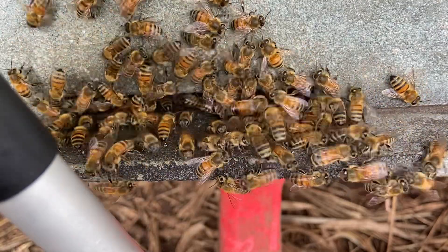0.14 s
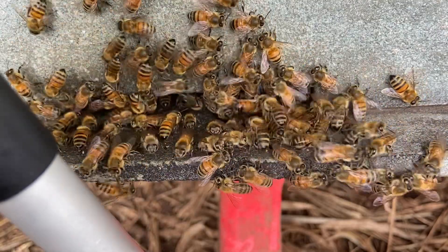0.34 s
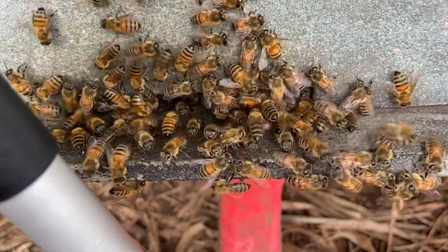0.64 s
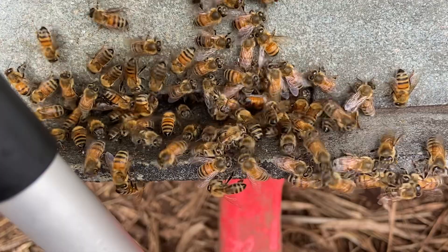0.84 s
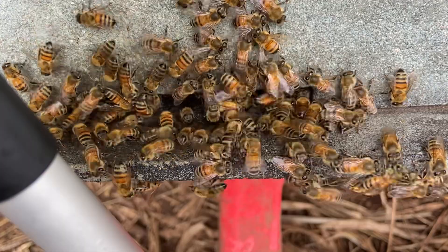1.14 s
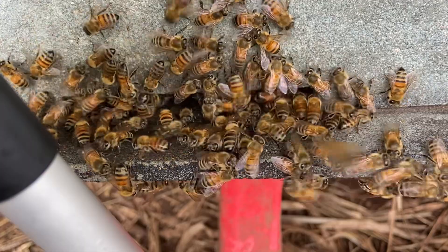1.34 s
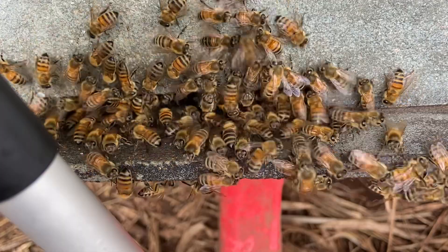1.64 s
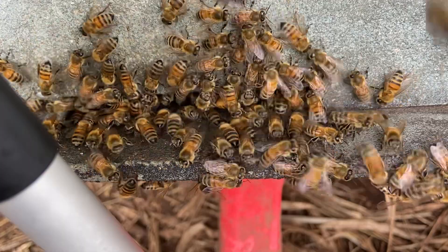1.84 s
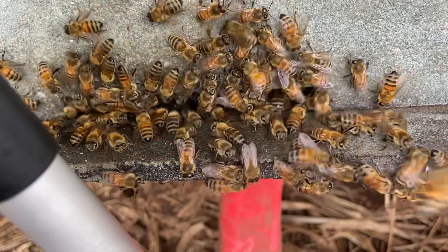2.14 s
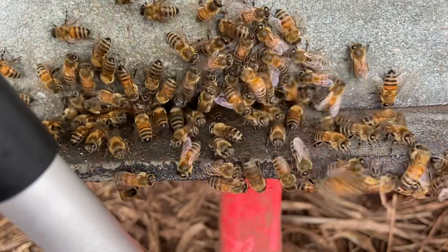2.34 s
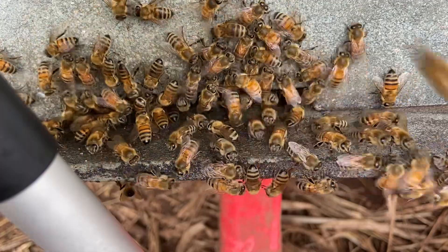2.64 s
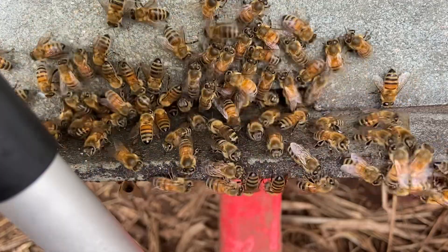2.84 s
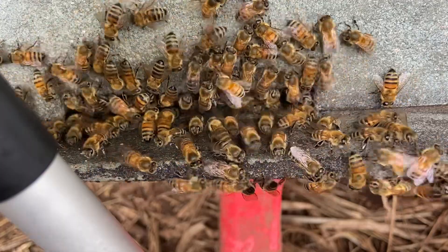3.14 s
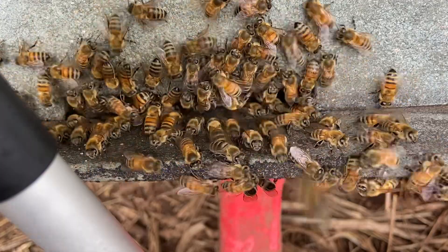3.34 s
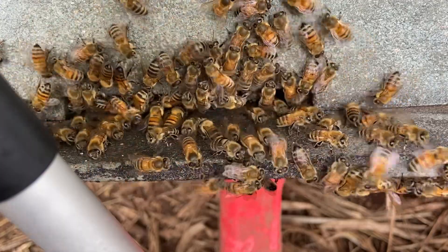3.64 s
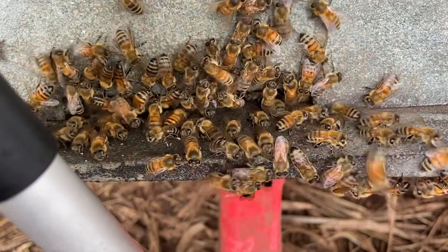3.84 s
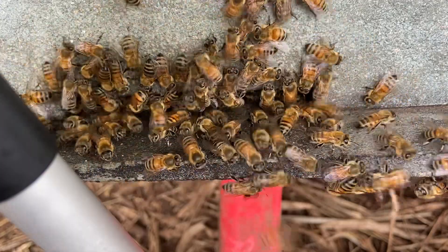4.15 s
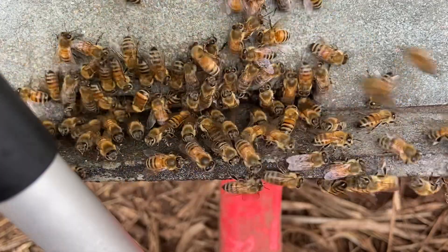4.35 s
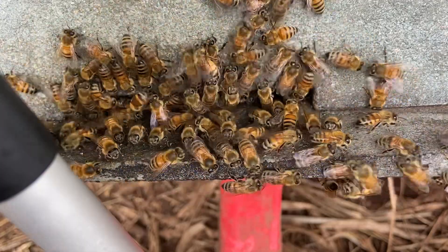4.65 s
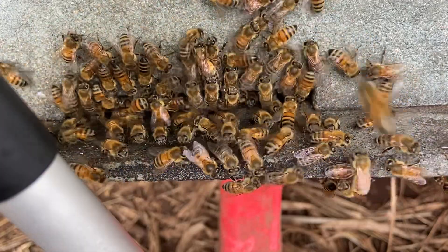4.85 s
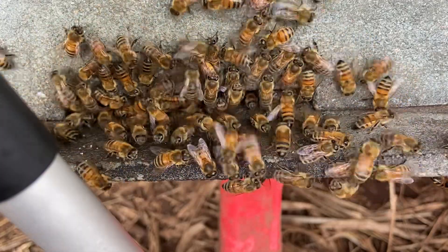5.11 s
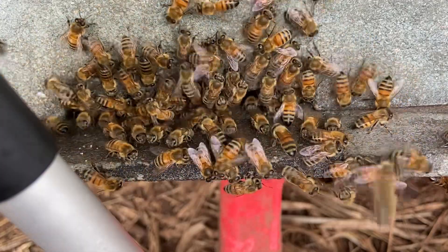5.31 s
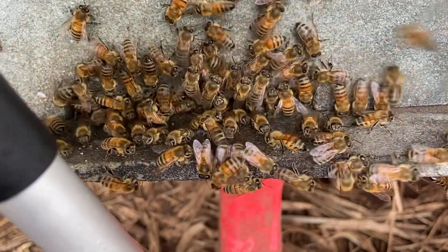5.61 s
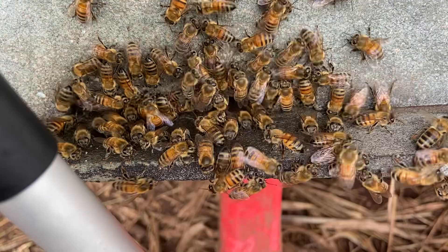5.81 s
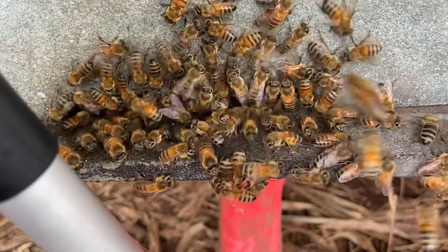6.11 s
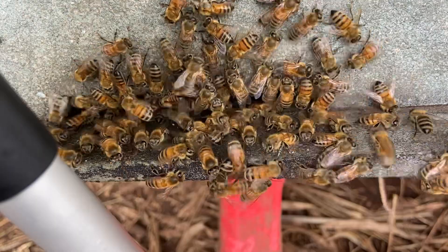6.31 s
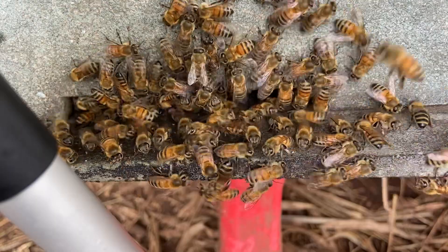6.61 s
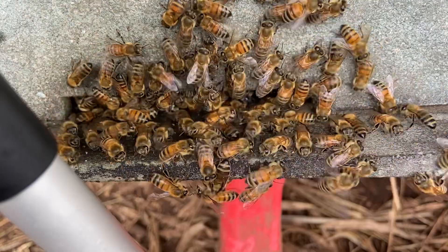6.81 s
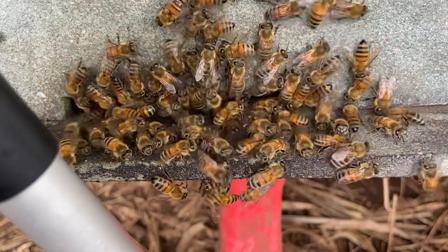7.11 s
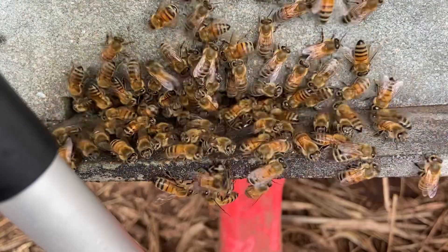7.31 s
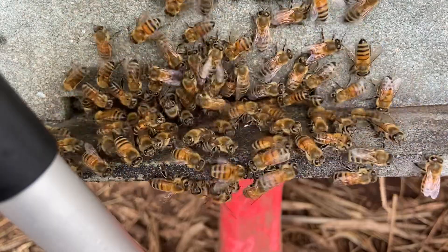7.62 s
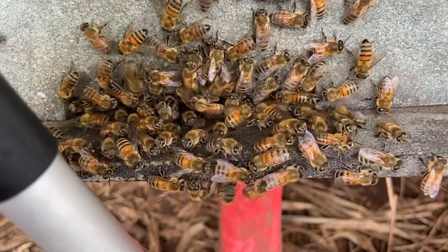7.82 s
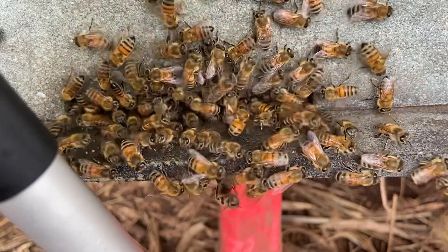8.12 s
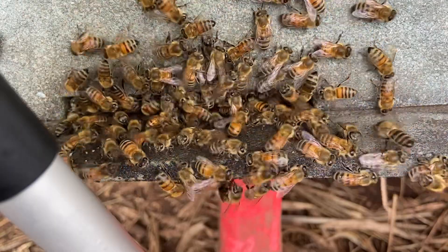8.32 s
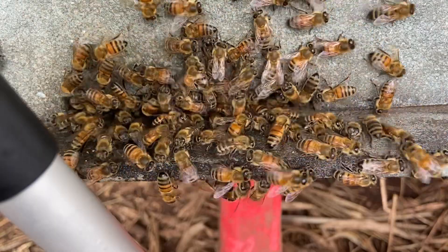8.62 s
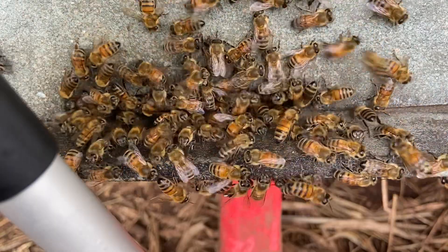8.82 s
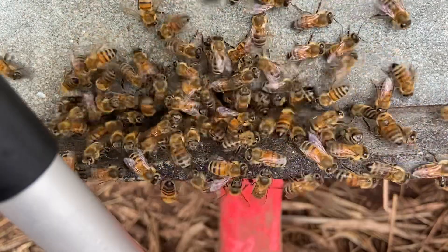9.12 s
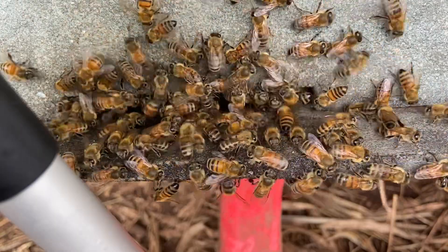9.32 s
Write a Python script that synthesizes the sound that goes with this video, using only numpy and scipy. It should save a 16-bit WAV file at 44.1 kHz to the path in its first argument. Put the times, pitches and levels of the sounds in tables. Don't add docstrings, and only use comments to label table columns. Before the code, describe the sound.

Dozens of honeybees hum in a dense, wavering low buzz while single bees swell close and dull puffs of wing air bump the microphone.

```python
import sys
import numpy as np
from scipy import signal
from scipy.fft import rfft, irfft, next_fast_len
from scipy.io import wavfile
from scipy.ndimage import uniform_filter1d

SR = 44100
rng = np.random.default_rng(int(sys.argv[2]) if len(sys.argv) > 2 else 0)


def natural_amplitude(level_db):
    exponent = np.asarray(level_db, float) / 20
    return 10 ** exponent


def unload_wav(signal):
    wavfile.write(
        sys.argv[1],
        SR,
        np.round(np.clip(np.atleast_2d(signal).T, -1, 1) * 32767).astype(np.int16),
    )


N = 417186
CYCLE = 1024
SLOW = 4

# (time [s], level [dB])
STIR = [(0.0, -54.5), (1.52, -54), (2.5, -51.5), (2.69, -53), (4.24, -53.5), (4.64, -53), (4.85, -50.5),
        (5.01, -53.5), (5.64, -50.5), (5.66, -52.5), (5.93, -53), (5.98, -52), (7.53, -53), (7.98, -52),
        (8.74, -53.5), (9.17, -52), (9.25, -51.5), (9.46, -53)]


def unit(x):
    return x / np.sqrt(np.mean(x ** 2))


def columns(table, step=1):
    s, *rest = np.transpose(table)
    return [np.interp(np.arange(0, N, step) / SR, s, c) for c in rest]


def walk(rate, step=1):
    steps = rng.standard_normal(500)
    turns = np.arange(N // 64 + 2) * 64 * rate / SR
    smooth = uniform_filter1d(np.interp(turns, np.arange(500), steps), size=5)
    return np.interp(np.arange(0, N, step) / 64, np.arange(len(smooth)), unit(smooth))


def wing_cycle(orders, turns, scatter_db):
    k, db = np.transpose(orders)
    chance = rng.standard_normal((4, len(k)))
    phase = 2 * np.pi * (chance[0] + turns * np.outer([0, 1], chance[1]))
    gain = natural_amplitude(db + scatter_db * chance[2:])
    angle = 2 * np.pi * np.outer(k, np.arange(CYCLE)) / CYCLE
    return np.einsum("ck,ckn->cn", gain, np.sin(angle + phase[:, :, None]))


def stroke_index(hz):
    return (np.cumsum(hz) * (CYCLE * SLOW / SR)).astype(int) % CYCLE


def crowd(count=40):
    # (time [s], level [dB])
    nearness = [(0.0, -46.5), (0.58, -41.5), (1.08, -55.5), (1.4, -55), (1.68, -44), (2.66, -46.5),
                (4.69, -45), (5.09, -41), (5.35, -40), (5.56, -51), (6.48, -45.5), (6.74, -40.5),
                (7.59, -53.5), (7.85, -53.5), (8.14, -43), (8.98, -45.5), (9.2, -42), (9.46, -44)]
    # (multiple of the beat, level [dB])
    overtones = [(3, 0), (4, -2), (5, 0.5), (6, 0.5), (7, -4.5), (8, -10.5), (9, -13.5), (10, -12),
                 (11, -10), (12, -9.5)]
    beat_hz, spread = 247.76, 0.13
    focus_db = -9.5
    (near_db,), (stir_db,) = columns(nearness, step=SLOW), columns(STIR, step=SLOW)
    second_db = -39 + 0.097 * (near_db + 46) + 0.96 * (stir_db + 53)
    beat, second, high = 0, 0, 0
    for place in np.linspace(-1, 1, count):
        detune = spread * (0.7 * place + 0.27 * place ** 3 - 0.15 * place ** 4)
        drift = 0.035 * walk(3.5, step=SLOW) + 0.014 * walk(22., step=SLOW)
        at = stroke_index(beat_hz * (1 + detune + drift))
        side = natural_amplitude(np.outer([-1, 1], 1.57 + 1.78 * walk(1.272, step=SLOW)))
        near = side * natural_amplitude(3.0 * walk(6., step=SLOW) + 2.57 * walk(16., step=SLOW))
        focus = natural_amplitude(focus_db * place ** 2)
        beat = beat + focus ** 0.25 * near * wing_cycle([(0.99, 0)], 0.29, 0.19)[:, at]
        second = second + near * wing_cycle([(1.98, 0)], 0.27, 2.03)[:, at]
        high = high + focus * near * wing_cycle(overtones, 0.28, 2.9)[:, at]
    return (natural_amplitude(near_db + 4.0) * unit(beat)
            + natural_amplitude(second_db) * unit(second)
            + natural_amplitude(stir_db + 8.0) * unit(high))


def near_bees():
    # (closest at [s], wing beat [Hz], level there [dB], time to cover the nearest distance [s])
    passes = [(.252, 236, -29.5, .02), (.46, 220, -39, 0.031), (.609, 253.5, -38, 0.043),
              (1.6, 261.5, -39, .05), (1.8, 277.7, -34, 0.025), (1.93, 245.5, -41, 0.054),
              (5.92, 213, -40, 0.037), (2.857, 241, -38.5, 0.021), (3.028, 243.5, -39, 0.017),
              (3.198, 241.3, -39, 0.033), (3.447, 233.8, -37, 0.028), (3.81, 234.2, -35, 0.04),
              (4.12, 252, -34, 0.036), (4.263, 224, -33, 0.017), (4.335, 247.9, -34.5, 0.06),
              (4.751, 247, -28.5, 0.021), (4.91, 244, -34, 0.054), (5.178, 240.7, -26, 0.064),
              (5.32, 238, -37, 0.049), (5.475, 243.6, -26.5, 0.025), (6.561, 245, -31, .035),
              (6.71, 223.5, -35, 0.032), (6.777, 239, -40, 0.026), (6.899, 209.5, -37.5, .03),
              (7.084, 251, -35, 0.032), (7.198, 246, -37, 0.049), (8.118, 251, -40, 0.051),
              (9.1, 263.4, -34.5, .05), (9.292, 260, -36.5, .025), (9.38, 258, -35.5, 0.025)]
    # (multiple of the beat, level [dB])
    overtone_mix = [(2, 0), (3, -13.5), (4, -17.5), (5, -17.5), (6, -23)]
    beat_falloff, overtone_falloff = 2.29, 1.29
    sag = 0.012
    out, t = 0, np.arange(0, N, SLOW) / SR
    for s, hz, db, reach_s in passes:
        along = (t - s) / reach_s
        distance = np.hypot(1, along)
        at = stroke_index(hz * (1 - sag * along / distance + 0.00898 * walk(25., step=SLOW)))
        beat = distance ** -beat_falloff * wing_cycle([(1, 0)], 0.12, 0.1)[:, at]
        overtones = natural_amplitude(-9.5) * distance ** -overtone_falloff * wing_cycle(overtone_mix, 0.16, 0.76)[:, at]
        pan_db = -2 + 3 * walk(4., step=SLOW)
        level_db = db + 0.5 * walk(20., step=SLOW) + np.array([pan_db, -pan_db]) / 2
        out = out + (beat + overtones) * natural_amplitude(level_db)
    return np.sqrt(2) * out


def crossing_bees():
    # (time [s], second harmonic [Hz], level [dB], left minus right [dB])
    flybys = [
        [(6.8, 414.5, -48, 0), (6.85, 459, -41, 6), (6.885, 429, -50, 11), (6.92, 468, -42, -1),
         (6.96, 510, -54, -6)],
        [(9.19, 523.6, -56, 0), (9.25, 543, -41, -10), (9.32, 551, -43, -10), (9.36, 521, -41.5, -11),
         (9.41, 488.4, -46, -8), (9.46, 482, -49, 1)],
    ]
    # (multiple of the beat, level [dB])
    rasp = [(1, 3), (2, 5), (3, -14.5), (4, -12.5), (5, -10), (6, -16), (7, -16.5), (9, -19), (11, -23),
            (12, -22), (13, -27), (14, -31), (16, -31), (17, -22)]
    out, t = 0, np.arange(0, N, SLOW) / SR
    for table in flybys:
        second_hz, db, pan_db = columns(table, step=SLOW)
        at = stroke_index(second_hz / 2 * (1 + 0.006 * walk(40., step=SLOW)))
        fade = np.clip(np.minimum(t - table[0][0], table[-1][0] - t) / 0.0096, 0, 1)
        gain = fade * natural_amplitude(db - 0.7 + np.array([pan_db, -pan_db]) / 2)
        out = out + gain * wing_cycle(rasp, 0.21, 2.4)[:, at]
    return np.sqrt(2) * out


def fanning_bees(count=3):
    # (time [s], wing beat [Hz], level [dB])
    fanning = [(0, 186, -63), (.45, 191.6, -44), (.9, 184, -70), (1.6, 180.6, -54.5), (2.4, 178, -64),
               (3.9, 183.5, -50), (4.6, 179.7, -53), (6.6, 186.3, -65.5), (6.88, 188.6, -40),
               (7.1, 180.6, -68.5), (8.9, 173, -54), (9.16, 169.5, -44), (9.46, 172, -58)]
    hz, db = columns(fanning, step=SLOW)
    out = 0
    for _ in range(count):
        at = stroke_index(hz * (1 + 0.06 * walk(7., step=SLOW) + 0.0231 * walk(25., step=SLOW)))
        stroke = wing_cycle([(1, -0.5), (2, -7.0), (3, -17)], 0.34, 0.79)
        out = out + natural_amplitude(4.6 * walk(6., step=SLOW)) * stroke[:, at]
    return natural_amplitude(db) * unit(out)


def puffs():
    # (time [s], peak [dB], starting eddy rate [Hz], length [s])
    gusts = [
        (.25, -17, 325, 0.0361),
        (4.722, -43, 118, .043),
        (4.807, -27, 130, 0.05),
        (5.18, -43, 121, 0.07),
        (5.489, -43, 123, 0.035),
        (6.517, -45, 101, 0.04),
        (7.045, -37, 152, 0.03),
        (8.26, -52, 99, .04),
        (9.097, -48, 99, 0.036),
        (9.399, -43, 113, 0.053),
    ]
    end_hz = 65
    out = np.zeros((2, N))
    t = np.arange(SR // 4) / SR
    for s, db, start_hz, length in gusts:
        quick = 0.0034 * (start_hz - end_hz)
        eddies = rng.standard_normal((3, len(t)))
        hz = end_hz + (start_hz - end_hz) * np.exp(-t / (0.39 * length))
        swirl = 2 * np.pi * np.cumsum(hz) / SR
        shape = (t / (0.29 * length)) * np.exp(1 - t / (0.32 * length))
        ragged = unit(uniform_filter1d(uniform_filter1d(eddies, size=110), size=110))
        front = np.sin(1.9 * swirl) + 0.51 * np.sin(3.1 * swirl + ragged[0])
        front = front * np.exp(-t / (0.42 * length))
        gust = np.sin(swirl + 0.56 * ragged[0] + 0.5 * ragged[1:]) + quick * front
        i = int(s * SR)
        out[:, i:i + len(t)] += (natural_amplitude(db + 2.0) * shape * gust)[:, :N - i]
    return out


def port_noise(spectrum):
    # (frequency [Hz], share heard alike [0-1], left leads by [radians], left minus right [dB])
    port_pair = [(40, 0.85, 0, -.3), (1000, 0.31, 0.5, 3.5), (3000, 0.75, -2, -4), (5800, 0.46, 1.3, -4),
                 (6680, 0.82, 0.07, 0.3), (8500, 0.99, 3, 0), (9800, 0.97, 3.5, 2), (11560, 0.95, 6.0, -2),
                 (13100, 0.9, 6.6, 1.5), (14700, 0.985, 9.4, -1.5)]
    size = next_fast_len(N)
    hz = np.arange(size // 2 + 1) * SR / size + 1
    at, db = np.transpose(spectrum)
    port_hz, *ports = np.transpose(port_pair)
    alike, lead, pan_db = (np.interp(hz, port_hz, c) for c in ports)
    alike = np.clip(alike, 0, 1)
    turn = np.exp(0.5j * np.outer([1, -1], lead))
    shared, *private = rfft(rng.standard_normal((3, size)))
    colour_db = np.interp(np.log(hz), np.log(at), db, left=-90)
    colour = natural_amplitude(colour_db + np.outer([0.5, -0.5], pan_db))
    mixed = np.sqrt(alike) * turn * shared + np.sqrt(1 - alike) * np.array(private)
    return unit(irfft(colour * mixed, size)[:, :N])


def draught():
    # (frequency [Hz], density [dB per Hz])
    spectrum = [(20, -16), (32, -19), (50, 3), (75, 3.5), (120, 2), (180, -7.5), (330, -9), (450, -27.5)]
    # (time [s], level [dB])
    breeze = [(0.0, -58), (0.45, -59), (0.68, -64.5), (2.21, -57), (2.55, -55), (2.85, -59), (3.21, -59),
              (4.74, -55), (6.16, -62.5), (6.66, -60), (7.51, -61), (8.51, -58), (9.2, -56.5),
              (9.46, -48.5)]
    return port_noise(spectrum) * natural_amplitude(columns(breeze)[0] + 5.0 + 3.2 * walk(9.))


def hiss():
    # (frequency [Hz], density [dB per Hz])
    spectrum = [(250, -0.5), (600, -1), (1000, -2), (1500, 0.5), (1900, -2.5), (2400, -5.5), (3200, -7.5),
                (4000, -9), (7000, -11), (9500, -11), (12000, -14.5), (14400, -14), (16000, -22)]
    return port_noise(spectrum) * natural_amplitude(columns(STIR)[0] + 5.5 + 0.66 * walk(14.))


def scene():
    wings = crowd() + near_bees() + crossing_bees() + fanning_bees()
    wings = signal.resample_poly(wings, SLOW, 1, axis=1)[:, :N]
    return wings + puffs() + draught() + hiss()


def band_limit(x):
    return signal.sosfilt(signal.butter(12, 15770, fs=SR, output="sos"), x)


def record(dry):
    low_cut = signal.butter(2, 35.7, "high", fs=SR, output="sos")
    heard = signal.sosfilt(low_cut, dry)
    return band_limit(heard)


dry = scene()
out = record(dry)
unload_wav(out)
```